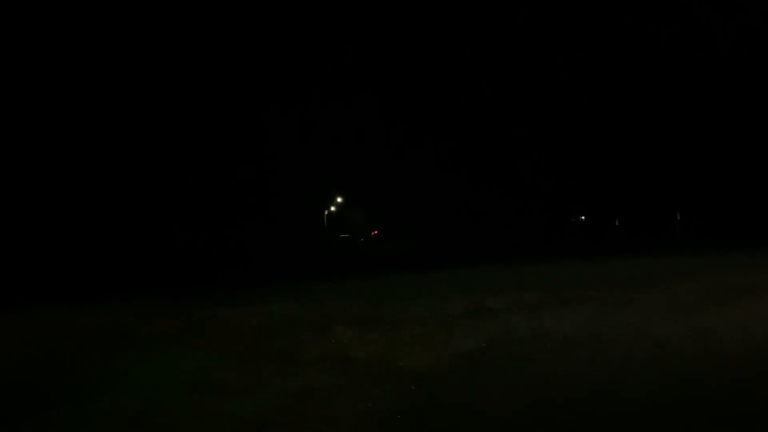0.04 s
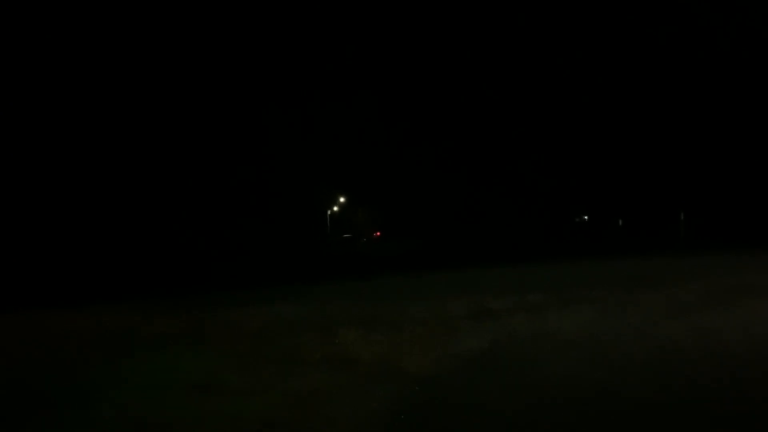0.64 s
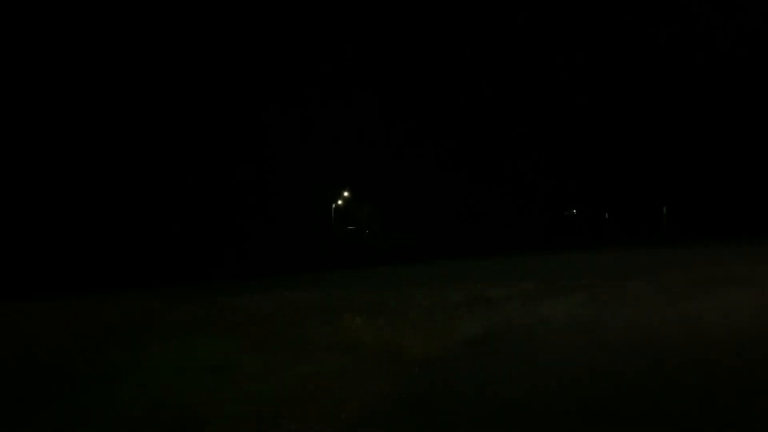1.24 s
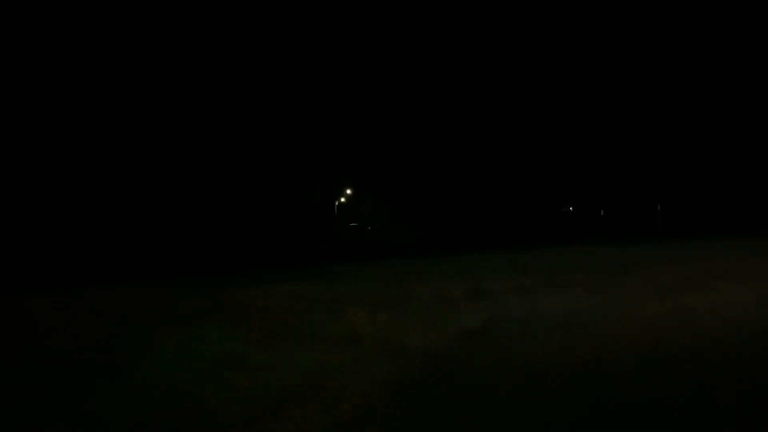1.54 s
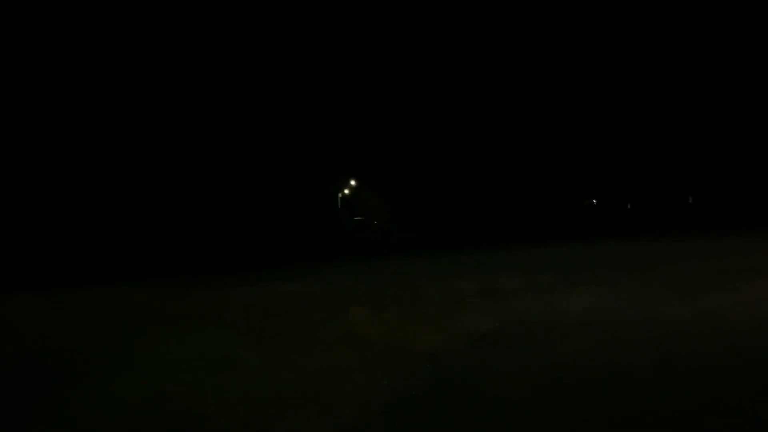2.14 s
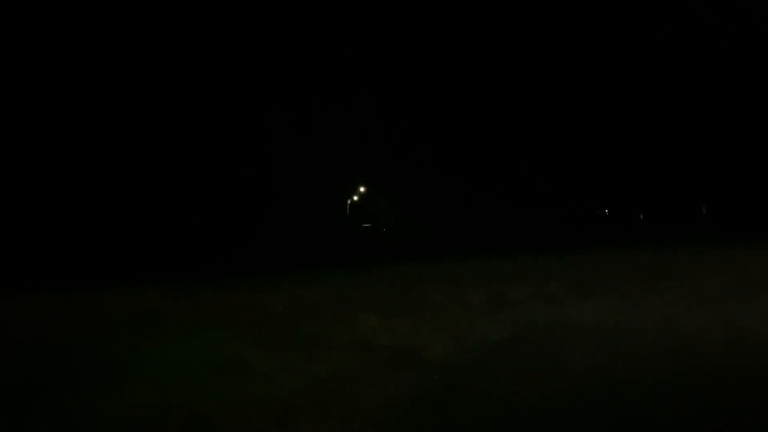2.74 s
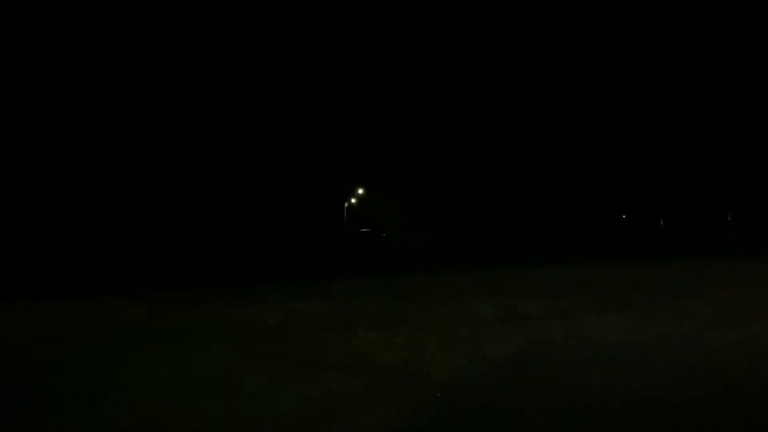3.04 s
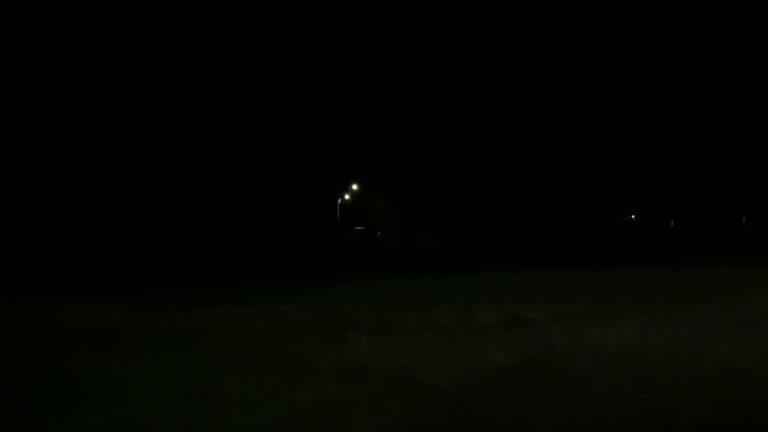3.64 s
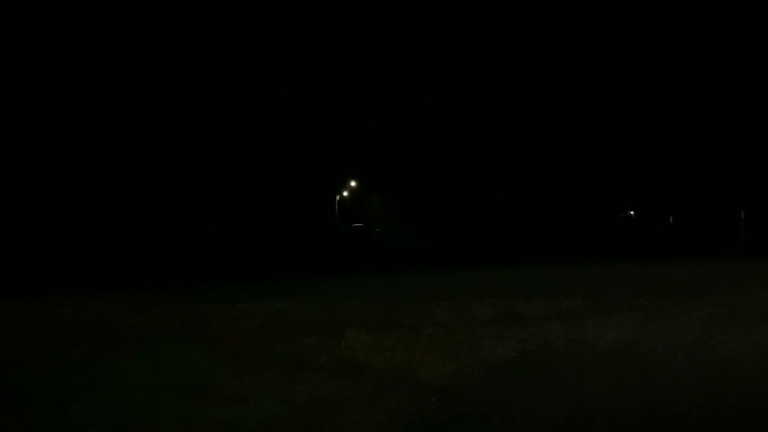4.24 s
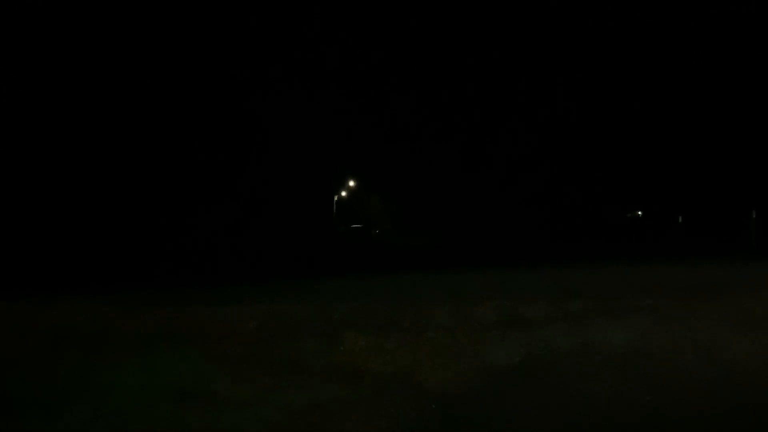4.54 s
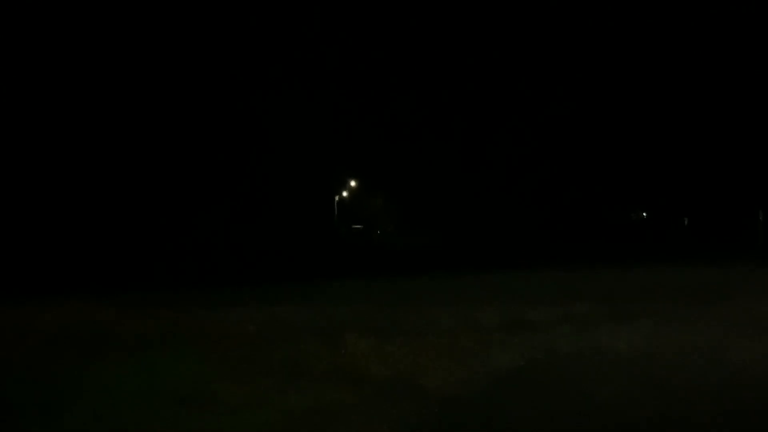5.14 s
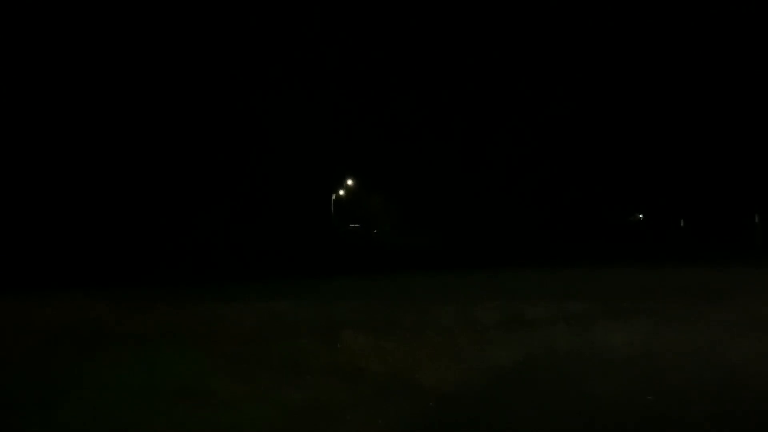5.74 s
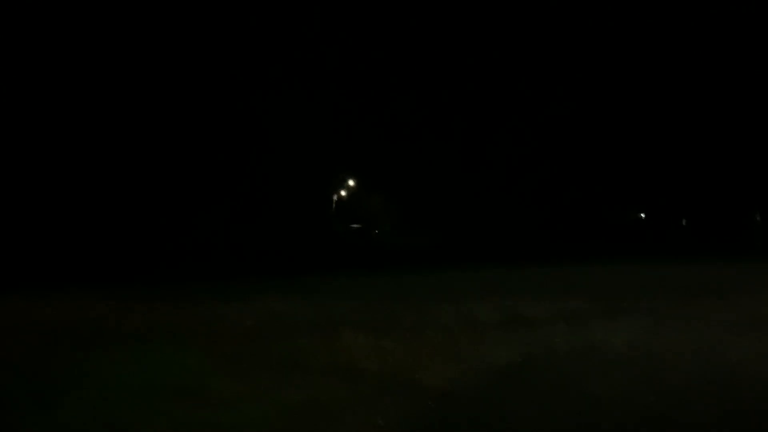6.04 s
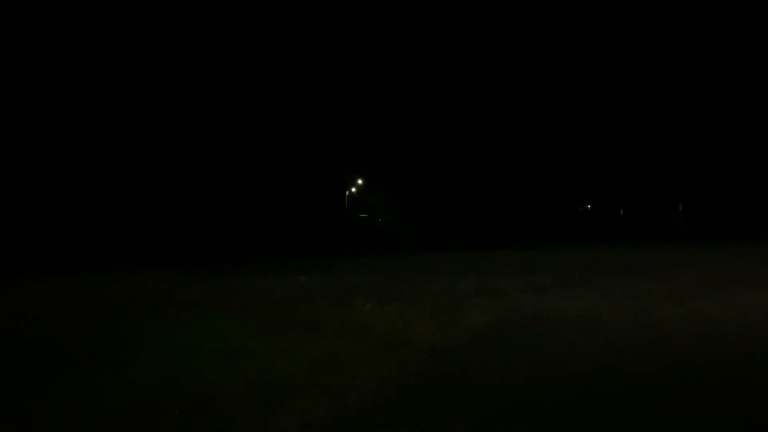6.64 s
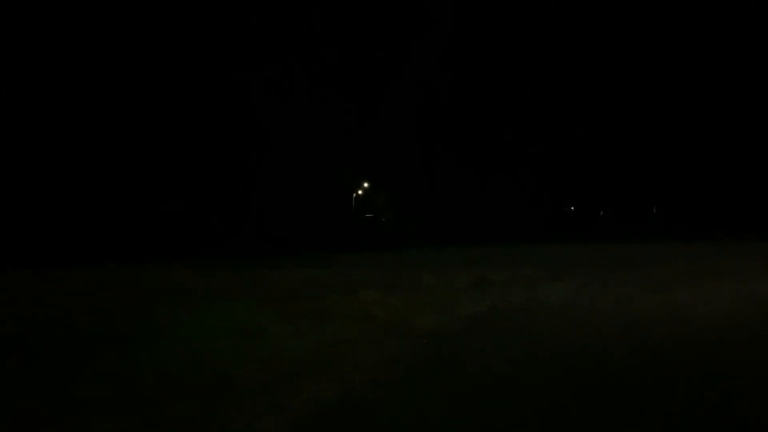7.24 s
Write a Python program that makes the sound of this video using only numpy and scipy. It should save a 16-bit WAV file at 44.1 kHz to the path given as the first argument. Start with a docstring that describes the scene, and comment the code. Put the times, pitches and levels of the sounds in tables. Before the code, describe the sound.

A two-stroke diesel truck coasts with a low throb and faint spurts of hiss. It blips the throttle for a gear change, with quick clacks and a brief chatter of gears, then pulls away loudly. The exhaust booms, snarls and briefly barks as the revs slowly sag and the tyres begin to rumble. It is heard from some distance on a road at night, with another engine idling softly near the microphone.

```python
"""A road at night, some way from a two-stroke diesel truck that coasts, blips for a gear change and pulls away.
Its exhaust stack booms and snarls at harmonics (orders) of the crankshaft rate, roars with turbulent gas and
cracks once a turn, while load slowly drags the revs down. Sharp knocks sound around the gear change and the
tyres rumble. An echo from further up the road returns Doppler-shifted upwards and beats with the direct sound.
Another engine idles near the two-port microphone."""
import sys
import numpy as np
from scipy import signal
from scipy.fft import rfft, irfft
from scipy.io import wavfile

SR = 44100
rng = np.random.default_rng(int(sys.argv[2]) if len(sys.argv) > 2 else 0)


def wrap_up_sound(samples):
    """Save the sound to the file named by the first command line argument, as 16-bit audio."""
    columns = np.atleast_2d(samples).T
    # keep every value between -1 and 1, then stretch to whole-number steps
    tamed = np.clip(columns, -1, 1)
    steps = np.round(tamed * 32767).astype(np.int16)
    wavfile.write(sys.argv[1], SR, steps)


N = 325268
TIME = np.arange(N) / SR
BINS = np.fft.rfftfreq(N, 1 / SR)


def gain_of(db):
    """Amplitude ratio of a level in decibels."""
    return 10 ** (np.asarray(db) / 20)


def unit_rms(x):
    """Normalisation to an rms of one."""
    return x / np.sqrt(np.mean(x ** 2) + 1e-20)


def curves(rows):
    """Linear interpolation of each column of a time table, sample by sample."""
    times, *columns = np.transpose(rows)
    return [np.interp(TIME, times, column) for column in columns]


def spectrum(points):
    """Interpolation of a frequency table at every bin, on a logarithmic axis."""
    hz, value = np.transpose(points)
    return np.interp(np.log(BINS + 1), np.log(hz + 1), value)


def coloured(x, points):
    """Spectral shaping by a table of levels, normalised to an rms of one."""
    return unit_rms(irfft(rfft(x) * gain_of(spectrum(points)), N))


def wander(bandwidth_hz, count=1024):
    """Random modulation: low-pass Gaussian noise with an rms of one."""
    hz = np.arange(count // 2 + 1) * SR / N
    slow = irfft(rfft(rng.standard_normal(count)) * np.exp(-(hz / bandwidth_hz) ** 2))
    return np.interp(TIME, np.linspace(0, N / SR, count), unit_rms(slow))


def gated(rows, attack_s, release_s):
    """Superposition of trapezoidal envelopes, one for each row of (start/s, end/s, height)."""
    return sum(height * np.clip((TIME - start) / attack_s, 0, 1)
               * np.clip(1 - (TIME - end) / release_s, 0, 1) for start, end, height in rows)


# Spectrum of the outdoor noise floor: f/Hz, relative density/dB
AIR_SPECTRUM = [(30, 3), (100, 6.5), (500, 6), (1500, -6.5), (2600, -11.5), (4000, -39.5), (7000, -47.5)]

def night_air(level_db=-52):
    """Ambient noise: a faint floor, uncorrelated between the two ports."""
    return gain_of(level_db) * coloured(rng.standard_normal((2, N)), AIR_SPECTRUM)


# Spectral lines of the idling engine: f/Hz, relative level/dB
IDLE_LINES = [(49, -52.5), (63.5, -41), (78.6, -47), (85, -46.5)]
# Its rumble: f/Hz, relative density/dB
IDLE_RUMBLE = [(15, -28.5), (28, -21.5), (45, -2), (60, 2.5), (85, 1), (130, 3), (250, 5.5), (450, -7),
               (900, -21), (2500, -61)]

def idling_engine(lines_db=-1, rumble_db=-41, hunting_cycles=0.031):
    """Phase modulation: hunting speed makes a nearby engine's low lines waver over a soft rumble."""
    lines = sum(gain_of(db) * np.cos(2 * np.pi * (hz * TIME + rng.random() + hunting_cycles * wander(2.1)))
                for hz, db in IDLE_LINES)
    rumble = coloured(rng.standard_normal(N), IDLE_RUMBLE)
    return gain_of(lines_db) * np.sqrt(2) * lines + gain_of(rumble_db) * rumble


# Envelope of the tyre rumble: t/s, level/dB
TYRE_ENVELOPE = [(3.0, -53.5), (5.5, -41.5), (7.38, -32.5)]
# Its spectrum: f/Hz, relative density/dB
TYRE_SPECTRUM = [(40, -29.5), (90, -5.5), (160, -4), (290, -1), (400, -5.5), (900, -17), (2000, -35.5),
                 (9000, -100)]

def tyres(waver_db=4.0):
    """Rolling noise: a low, lumpy rumble that grows through the pull."""
    level_db = curves(TYRE_ENVELOPE)[0] + waver_db * wander(30)
    return gain_of(level_db) * coloured(rng.standard_normal(N), TYRE_SPECTRUM)


# Spectrum of the grazing gear teeth: f/Hz, relative density/dB
GEAR_SPECTRUM = [(150, -30.5), (350, -5.5), (540, 7), (800, -0.5), (1000, -24), (1550, -16.5), (2200, -20),
                 (6000, -66)]

def gear_chatter(start_s=1.605, end_s=1.77, level_db=-34.5, knocks_per_s=420, uneven_db=3):
    """Shot noise: gear teeth strike each other at random instants before they engage."""
    strikes = rng.random(N) < knocks_per_s / SR
    knocks = strikes * gain_of(uneven_db * rng.standard_normal(N)) * rng.choice([-1, 1], N)
    envelope = gated([(start_s, end_s, gain_of(level_db))], attack_s=0.059, release_s=0.05)
    return envelope * coloured(knocks, GEAR_SPECTRUM)


# Sharp knocks, those in the gear change hard firings a turn apart: t/s, relative level/dB, low-pass cutoff f/Hz
KNOCKS = [(0.881, -35, 1500), (1.412, -37, 2000), (1.627, -32, 1400), (1.650, -27, 2000),
          (1.681, -27, 2000), (1.688, -31, 1400), (1.711, -26, 7000), (1.739, -23.5, 7000)]
# Their common spectrum: f/Hz, relative density/dB
KNOCK_SPECTRUM = [(200, -6), (700, 9), (1600, 5), (2500, -9), (4000, -22), (5500, -22), (7000, -56),
                  (12000, -81)]

def driveline_clacks(gain_db=-1.5, blow=7, rattle_s=0.0025, ring=.12, ring_s=.02):
    """Impact noise: sharp knocks in the coast and hard firings a turn apart in the gear change, each with a
    blow, a rattle and a faint ring."""
    hits = np.zeros(N)
    for onset_s, db, cutoff_hz in KNOCKS:
        age = abs(TIME - onset_s)
        envelope = (TIME >= onset_s) * (np.exp(-age / rattle_s) + ring * np.exp(-age / ring_s))
        burst = envelope * rng.standard_normal(N)
        burst[round((onset_s + .001) * SR)] -= blow
        hits += gain_of(db) * signal.sosfilt(signal.butter(2, cutoff_hz, fs=SR, output="sos"), burst)
    response = unit_rms(gain_of(spectrum(KNOCK_SPECTRUM)))
    return gain_of(gain_db) * irfft(rfft(hits) * response, N)


# Spurts of hiss: start t/s, end t/s, level/dB
SPURT_SPANS = [(0, .11, -65), (.08, .23, -67), (.39, .51, -68), (.62, .7, -72.5), (.86, 1.0, -72),
               (1.64, 1.8, -67), (1.725, 1.76, -65)]
# Their spectrum: f/Hz, relative density/dB
SPURT_SPECTRUM = [(1500, -30), (3000, 5), (4000, 5.5), (5600, -0.5), (6400, -16), (7400, -33), (12000, -55)]

def spurts():
    """Gated band noise: short spurts of bright hiss during the coast and the gear change."""
    spans = [(start, end, gain_of(db)) for start, end, db in SPURT_SPANS]
    envelope = gated(spans, attack_s=0.026, release_s=0.03)
    return envelope * coloured(rng.standard_normal(N), SPURT_SPECTRUM)


# Envelope of the gas and blower hiss: t/s, relative level/dB
BLOWER_ENVELOPE = [(0, -27), (.35, -33), (1.55, -38.5), (1.95, -33), (2.2, -31.5), (2.7, -30), (3.1, -25.5),
                   (3.5, -27.5), (5.35, -23.5), (6.2, -27.5), (6.85, -28), (7.38, -31)]
# Its spectrum: f/Hz, relative density/dB
BLOWER_SPECTRUM = [(500, -34), (1800, 1.5), (2900, 4.5), (3600, -2), (4500, -8.5), (5600, -15.5),
                   (6400, -24.5), (7400, -39.5), (12000, -56.5)]

def blower(turns, effort_db, gain_db=7.0, waver_db=0.36):
    """Flow noise: gas and blower hiss follows the engine's effort and pulses faintly with the firings."""
    level_db = gain_db + effort_db + curves(BLOWER_ENVELOPE)[0] + waver_db * wander(5.5)
    return gain_of(level_db) * coloured(gas_puffs(turns, decay_firings=0.55, steady=4.2), BLOWER_SPECTRUM)


# Doppler shift of the echo: t/s, ratio of reflected to direct frequency
DOPPLER_RATIO = [(2.8, 1.1), (3.8, 1.108), (4.5, 1.102), (5.5, 1.098), (6.4, 1.09), (7.38, 1.075)]
# Envelope of the echo: t/s, relative level/dB
ECHO_ENVELOPE = [(1.8, -21), (2.8, 0), (3.7, 1.5), (5.5, 2.5), (6.4, 2.5), (7.38, -5)]
# Harmonics that the echo carries: order
REFLECTED_ORDERS = (4, 5, 7, 8, 9, 12, 13, 14, 17, 21, 23)
# Their strengths, in the same sequence: relative level/dB
REFLECTED_LEVELS = [-14, -16.5, -23.5, -19.5, -12, -15.5, -14.5, -19, -18, -23.5, -28]

def road_echo(crank_hz, effort_db, smear_rad=.2, fading=0.47):
    """Doppler effect: the truck nears a reflector, so the echo is higher than the receding direct sound."""
    turns = np.cumsum(crank_hz * curves(DOPPLER_RATIO)[0]) / SR
    echo = np.zeros(N)
    for order, db in zip(REFLECTED_ORDERS, REFLECTED_LEVELS):
        amplitude = gain_of(db) * (1 + fading * wander(3.3))
        phase = 2 * np.pi * (order * turns + rng.random()) + smear_rad * order * wander(0.98)
        echo += amplitude * np.cos(phase)
    return np.sqrt(2) * gain_of(effort_db + curves(ECHO_ENVELOPE)[0]) * echo


# Crankshaft rate through the coast and the gear change: t/s, f/Hz
SHIFT_REVS = [(0.0, 32.1), (0.66, 31.9), (1.058, 32.3), (1.364, 31.9), (1.56, 29.8), (1.624, 31.1),
              (1.724, 34.8), (1.9, 35.6), (2.1, 36.6)]
PULL_S = 2.22  # the new gear takes the load

def crank_rate(top_hz=36.93, sag_hz_per_s=.69):
    """Fundamental frequency: it follows the gear change, then falls steadily under load."""
    final_hz = top_hz - sag_hz_per_s * (TIME[-1] - PULL_S)
    return curves([*SHIFT_REVS, (PULL_S, top_hz), (TIME[-1], final_hz)])[0]


# Presses of the throttle: down t/s, up t/s, depth (0-1)
THROTTLE_PRESSES = [(-.4, 0.027, 0.42), (1.55, 1.745, 0.34), (1.975, 7.4, 0.76)]
FULL_THROTTLE_DB = -27

def exhaust_effort(coast_db=-35, coast_db_per_s=-1.26):
    """Source level in dB: the throttle lifts the exhaust from a dying coast towards its full level."""
    shut_db = coast_db + coast_db_per_s * np.minimum(TIME, PULL_S)
    throttle = gated(THROTTLE_PRESSES, attack_s=0.14, release_s=0.15)
    return shut_db + throttle * (FULL_THROTTLE_DB - shut_db)


def rasp(exhaust, corner_hz=1100, shut_db=-6.5, open_db=3.5, drift_db_per_s=0.01):
    """Treble shelving: the exhaust's upper range builds up a little after the throttle opens."""
    treble = signal.sosfiltfilt(signal.butter(3, corner_hz, "high", fs=SR, output="sos"), exhaust)
    opening = gated(THROTTLE_PRESSES, attack_s=0.47, release_s=0.37)
    shelf_db = shut_db + (open_db - shut_db) * opening + drift_db_per_s * np.maximum(TIME - PULL_S, 0)
    return exhaust + (gain_of(shelf_db) - 1) * treble


# Aspect of the stack as the truck turns away: t/s, view (0 side-on, 1 three-quarter, 2 from behind)
STACK_ASPECT = [(2.7, 0), (3.05, 0.8), (3.7, 1.2), (5.1, 2)]

def view_weights():
    """Directivity: the shares heard of the side-on, three-quarter and rear radiation of the stack."""
    aspect = curves(STACK_ASPECT)[0]
    return [np.interp(aspect, [0, 1, 2], view) for view in np.eye(3)]


# Gas flow of the four firings of one bank in a turn: relative level/dB
FIRING_LEVELS = [-1.3, -2, 0.4, -0.5]

def gas_puffs(turns, decay_firings, steady):
    """Amplitude modulation: flow noise surges each time a cylinder's valves open."""
    firings = turns * len(FIRING_LEVELS)
    cylinder = np.floor(firings).astype(int) % len(FIRING_LEVELS)
    surge = gain_of(FIRING_LEVELS)[cylinder] * np.exp(-(firings % 1) / decay_firings)
    return (steady + surge) * rng.standard_normal(N)


# Spectra of the turbulent gas: f/Hz, then relative density/dB side-on, three-quarter, from behind
ROAR_SPECTRA = [(24.53, -40.5, -38.5, -39.5), (49.7, -16, -16, -15), (100, -3.5, -0.5, -3),
                (240, -4.5, -5, -5), (380, -4, -7, -5), (514, -7, -9, -6.5), (734, -8, -0.5, -6),
                (890, -11.5, -6, -11), (1260, -13, -10.5, -10.5), (1530, -12, -13, -14),
                (1840, -18.5, -16, -18.5), (2770, -24, -23.5, -20.5), (3750, -46, -46, -44),
                (6000, -76, -79, -78.5)]

def roar(turns):
    """Turbulence: pulsed gas radiates broadband noise whose spectrum changes as the stack turns away."""
    hz, *views_db = np.transpose(ROAR_SPECTRA)
    gas = rfft(gas_puffs(turns, decay_firings=0.69, steady=0.83))
    views = [irfft(gas * gain_of(spectrum(np.c_[hz, db])), N) for db in views_db]
    return unit_rms(sum(weight * view for weight, view in zip(view_weights(), views)))


# Low harmonics that the exhaust carries furthest: order
LOW_ORDERS = (4, 5, 7)
# Their envelopes: t/s, then relative level/dB of orders 4, 5 and 7
BOOM_ENVELOPES = [(0.03, -28, -43.5, -40.5), (.17, -37.5, -51.5, -36), (.65, -35, -56, -35.5),
                  (.92, -37.5, -55, -31.5), (1.152, -37.5, -60.5, -34), (1.48, -38.5, -51, -41),
                  (1.62, -32.5, -50, -41), (1.76, -32.5, -40, -36), (1.87, -42.5, -48, -49.5),
                  (2.0, -39, -48, -45), (2.101, -34.5, -37.5, -41), (2.321, -32, -44, -42.5),
                  (2.52, -31, -32, -41), (3.1, -29, -32.5, -45.5), (4.3, -31, -32, -51.5),
                  (5.649, -30.5, -28, -49), (6.45, -29, -32, -42.5), (7.1, -29.5, -34, -34.5),
                  (7.38, -31.5, -33.5, -34.5)]

def boom(turns, gain_db=-0.3, waver_db=0.6):
    """Beating: three clean low harmonics throb against each other once a turn."""
    notes = [gain_of(db + waver_db * wander(5)) * np.cos(2 * np.pi * (order * turns + rng.random()))
             for order, db in zip(LOW_ORDERS, curves(BOOM_ENVELOPES))]
    return np.sqrt(2) * gain_of(gain_db) * sum(notes)


# Narrow resonances of the pipework: f/Hz, width/Hz, peak gain/dB
PIPE_RESONANCES = [(477, 7, 2.5), (571, 8, 6), (957, 24, 8)]

def pipe_gain(hz):
    """Resonance: a harmonic swells as it glides through a peak of the pipework's response."""
    return gain_of(sum(db / (1 + (2 * (hz - centre) / width) ** 2) for centre, width, db in PIPE_RESONANCES))


# Harmonics of the stack: order, then relative level/dB side-on, three-quarter, from behind
SNARL_HARMONICS = [(3, 0, -9, -12), (6, -8, -5, -9), (8, 5, -2, -4), (9, 4, 3, 0), (10, -5, -1, -1),
                   (11, 2.5, -4, -7), (12, -2, 2.5, -4), (13, 2, 3.5, -2), (14, -5, -6, 0),
                   (15, -4, -4, -13), (16, -12, -4, -14), (17, -7, -4, -6), (18, -3, 0, -7),
                   (19, -1, -4, -5), (20, -9, -6, -9), (21, -14, -6, -6), (22, -7, -7, -10),
                   (23, -9, -2.5, -7), (24, -13, -5, -7), (25, -9, -12, -11), (27, -24, -16, -12),
                   (28, -12, -8, -9), (29, -22, -20, -18), (30, -15, -13, -15), (31, -11, -12, -16),
                   (32, -16, -10, -11), (33, -16, -20, -19), (35, -22, -16, -20), (36, -16, -11, -18),
                   (37, -13, -20, -24), (38, -14, -17, -22), (39, -10, -10, -22), (40, -11, -7, -19),
                   (41, -13, -12, -19), (42, -26, -17, -23), (44, -19, -15, -22), (50, -28, -24, -27)]
# Harmonics that surge and sink once the truck has turned its back: order
SURGING_ORDERS = (9, 10, 13, 14)
# Response of the path over the ground: f/Hz, relative gain/dB
GROUND_RESPONSE = [(110, 1.5), (280, -0.5), (450, -1.5), (650, 1.5), (850, -0.5), (1200, -1), (1500, 1),
                   (2000, 3.5)]

def snarl(turns, crank_hz, fading=0.3, fading_hz=3.0, flutter_hz=2.9, flutter_depth=.75):
    """Multipath fading: uneven cylinders sound every order, and each wavers as the truck's paths change."""
    orders, *views_db = np.transpose(SNARL_HARMONICS)
    weights = view_weights()
    behind = np.clip(curves(STACK_ASPECT)[0] - .5, 0, 1)
    harmonics = np.zeros(N)
    for order in range(3, 58):
        if order in LOW_ORDERS:
            continue
        amplitude = sum(weight * gain_of(np.interp(order, orders, db))
                        for weight, db in zip(weights, views_db))
        amplitude *= pipe_gain(order * crank_hz) * (1 + fading * wander(fading_hz))
        phase = 2 * np.pi * (order * turns + rng.random()) + fading * wander(fading_hz)
        if order in SURGING_ORDERS:
            flutter = np.sin(2 * np.pi * (flutter_hz * TIME + rng.random()) + wander(0.93))
            amplitude *= 1 + flutter_depth * behind * flutter
        harmonics += amplitude * np.cos(phase)
    return coloured(harmonics, GROUND_RESPONSE)


# Spells in which one cylinder barks above the rest: start t/s, end t/s, added strength, release/s
BARK_SPELLS = [(2.82, 3.09, .41, .07), (2.78, 3.7, .22, .35)]
# Single firings that crack harder still: t/s, added strength
HARD_CRACKS = [(3.276, .36), (3.359, .24), (3.442, .38), (3.498, .52), (3.525, .36), (3.609, .48),
               (3.748, .36)]

def bark_strength(usual=.15, rise_s=.17, hard_width_s=.009):
    """Amplitude envelope of the loud cylinder: spells of barking and single hard firings add up."""
    spells = sum(gated([spell], rise_s, release_s) for *spell, release_s in BARK_SPELLS)
    hard = sum(height * np.exp(-((TIME - at_s) / hard_width_s) ** 2) for at_s, height in HARD_CRACKS)
    return usual + spells + hard


# Modes of the stack: f/Hz, decay time/s, relative level/dB
RINGING_MODES = [(445, .006, -15), (660, .005, -18), (835, .007, -15), (1450, .007, -17)]

def crack(turns, shock_s=0.00062, low_hz=330, top_hz=1480, bounce_s=0.0075, bounce=0.3, uneven_db=1.4):
    """Impulse response: once a turn a steep pulse rings the stack and reflects off the truck's body."""
    impulses = np.diff(np.floor(turns), prepend=np.floor(turns[0])) * gain_of(uneven_db * wander(18))
    t = TIME[:SR // 40]
    shock = (t / shock_s - 1) * np.exp(-t / shock_s)
    ringing = sum(gain_of(db) * np.exp(-t / decay_s) * np.cos(2 * np.pi * hz * t)
                  for hz, decay_s, db in RINGING_MODES)
    pulses = signal.oaconvolve(impulses, shock - ringing)[:N]
    pulses = signal.sosfilt(signal.butter(5, top_hz, fs=SR, output="sos"), pulses)
    # the narrow mouth of the stack radiates little of the pulse's bass
    pulses = signal.sosfiltfilt(signal.butter(2, low_hz, "high", fs=SR, output="sos"), pulses)
    return unit_rms(pulses + bounce * np.interp(TIME - bounce_s, TIME, pulses))


def truck(tone_db=1.7, roar_db=-6, tone_per_load=0.8, roar_per_load=-0.43, jitter_turns=0.002, duck=.45):
    """Superposition of the truck's sources: load makes the exhaust louder, more tonal and raspier."""
    crank_hz, effort_db = crank_rate(), exhaust_effort()
    load_db = effort_db - FULL_THROTTLE_DB
    turns = np.cumsum(crank_hz) / SR + jitter_turns * wander(11)
    turns -= np.interp(3.0275, TIME, turns)  # the loud cylinder fires at whole turns, one at this t/s
    bark = bark_strength()
    # the harder one cylinder barks, the less the even snarl of the others is heard
    tones = (1 - duck * bark) * snarl(turns, crank_hz) + bark * crack(turns)
    tones *= gain_of(tone_db + tone_per_load * load_db)
    gas = gain_of(roar_db + roar_per_load * load_db) * roar(turns)
    exhaust = rasp(gain_of(effort_db) * (tones + gas))
    return (exhaust + boom(turns) + blower(turns, effort_db) + spurts() + road_echo(crank_hz, effort_db)
            + driveline_clacks() + gear_chatter() + tyres())


# Level difference between the microphone ports: f/Hz, left minus right level/dB
PORT_BALANCE = [(60, -3.5), (100, -4.5), (170, -6.5), (280, -5.5), (470, -3), (800, -3.5), (1330, -1.5),
                (2240, -2.5), (3000, 2), (3750, -1.5)]
# Phase difference between the ports: f/Hz, lead of the left/rad
PORT_LEAD = [(50, -.15), (170, -.15), (350, .15), (680, -.42), (1300, -.28), (1600, .65), (2150, 2.8),
             (2520, 3.4), (3000, 5.2), (3500, 6.28), (6000, 6.4)]

def scene(scatter_db=-19, reverberation_s=0.19):
    """Two-port reception: one sound with level and phase differences, plus ground scatter and night air."""
    source = (truck() + idling_engine()) * signal.windows.tukey(N, .001)
    left_response = gain_of(spectrum(PORT_BALANCE) / 2) * np.exp(.5j * spectrum(PORT_LEAD))
    ports = irfft(rfft(source) * np.array([left_response, 1 / left_response]), N)
    t = TIME[:SR // 5]
    tail = rng.standard_normal((2, len(t))) * gain_of(-60 * t / reverberation_s)
    tail /= np.linalg.norm(tail[0])
    scatter = signal.fftconvolve(ports, tail, axes=1)[:, :N]
    return ports + night_air() + gain_of(scatter_db) * scatter


def record(dry, edge_hz=12300):
    """Band limiting: a linear-phase low-pass filter removes the highest treble."""
    low_pass = signal.firwin(511, edge_hz, window=("kaiser", 9), fs=SR)
    return signal.oaconvolve(dry, low_pass[None], "same")


dry = scene()
out = record(dry)
wrap_up_sound(out)
```